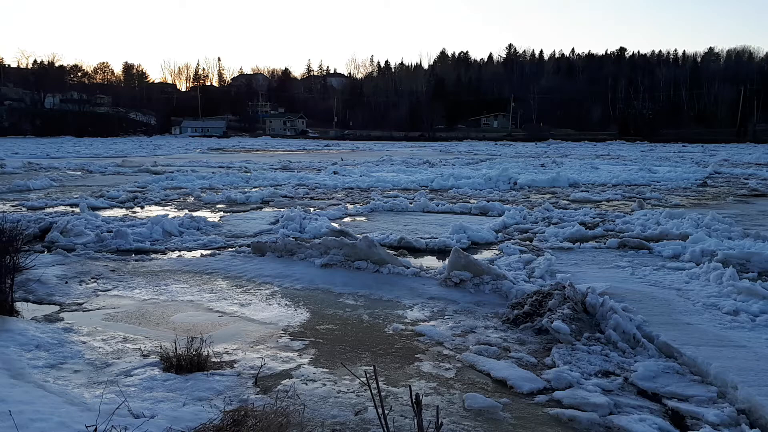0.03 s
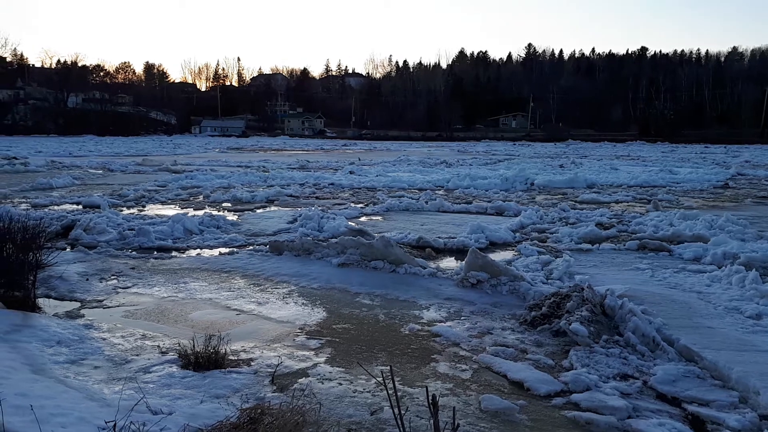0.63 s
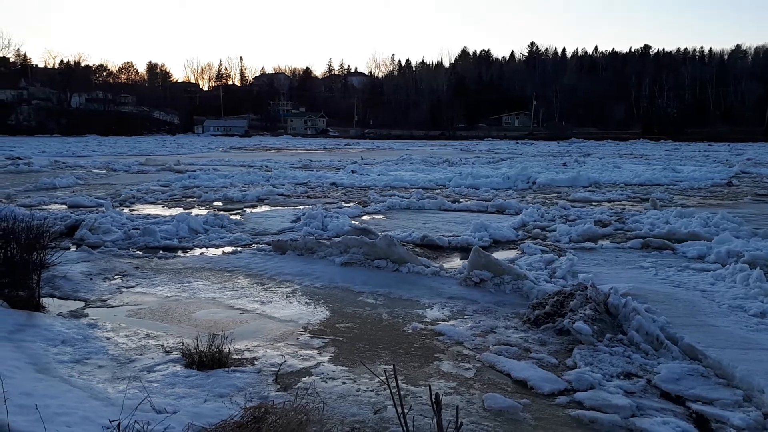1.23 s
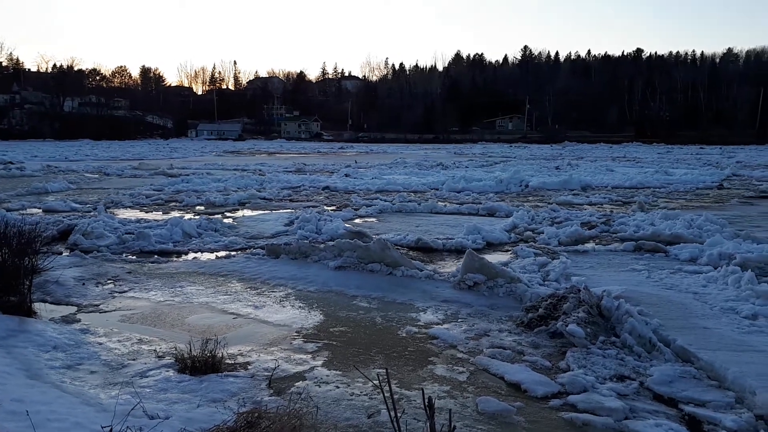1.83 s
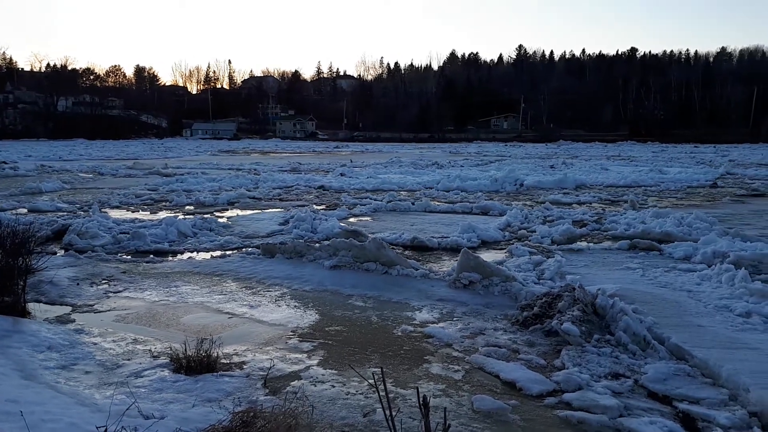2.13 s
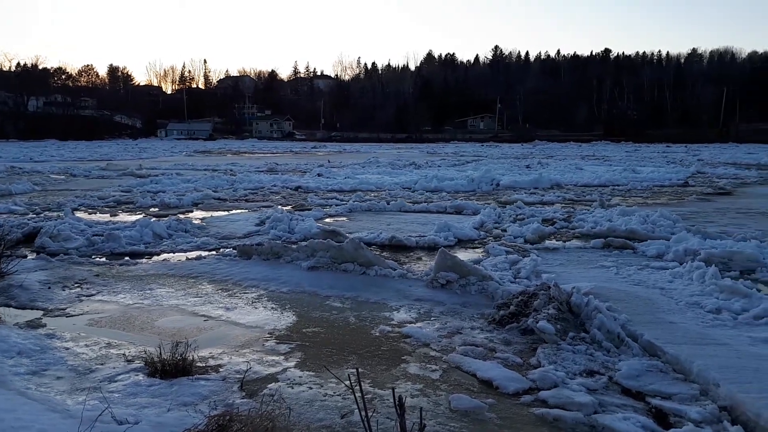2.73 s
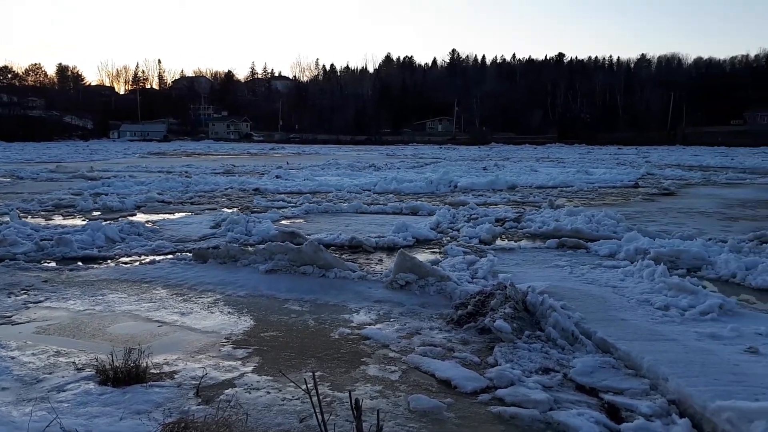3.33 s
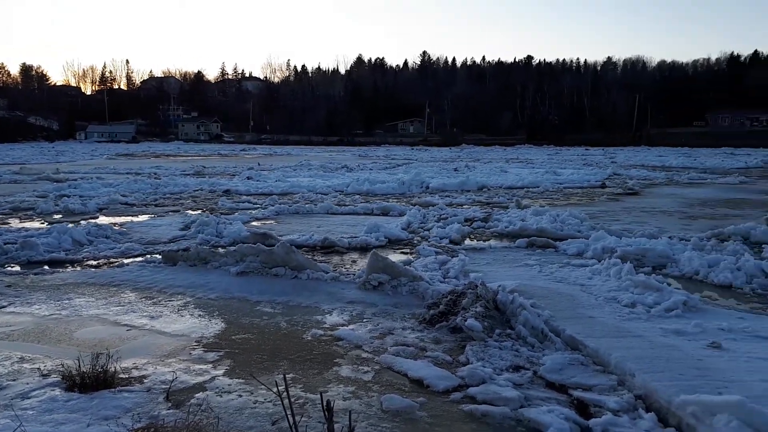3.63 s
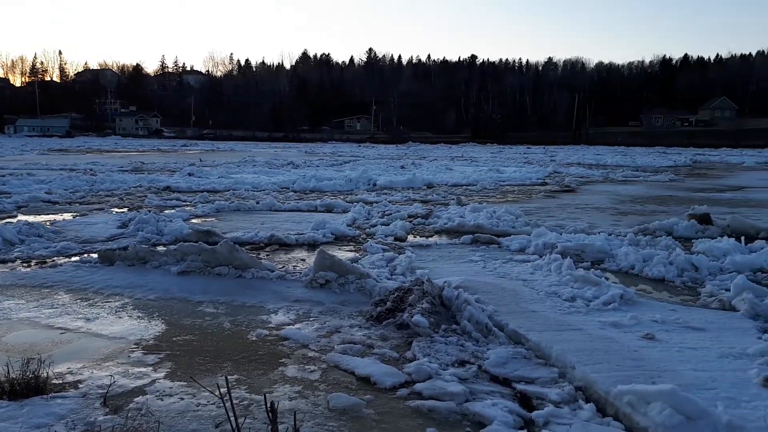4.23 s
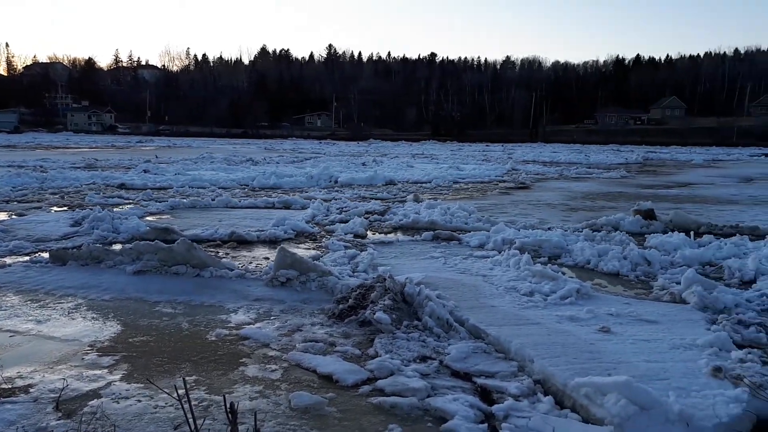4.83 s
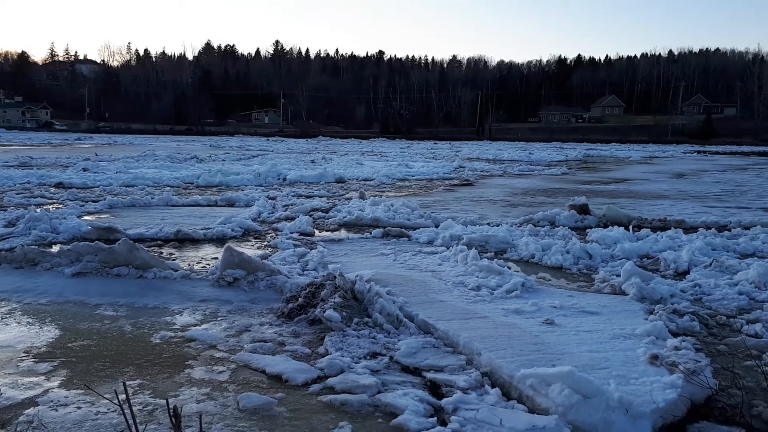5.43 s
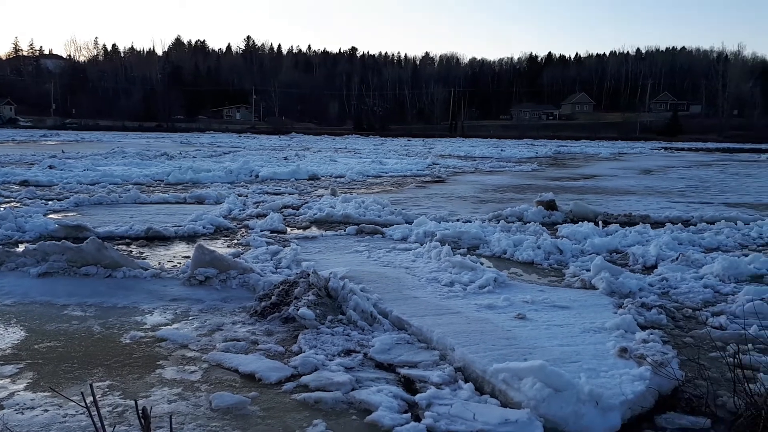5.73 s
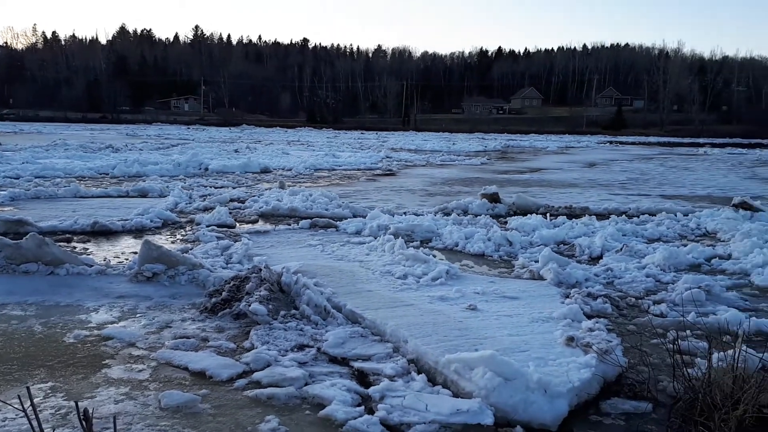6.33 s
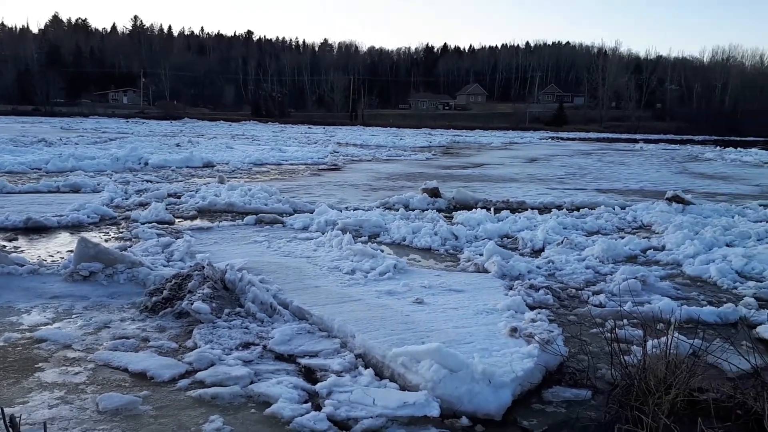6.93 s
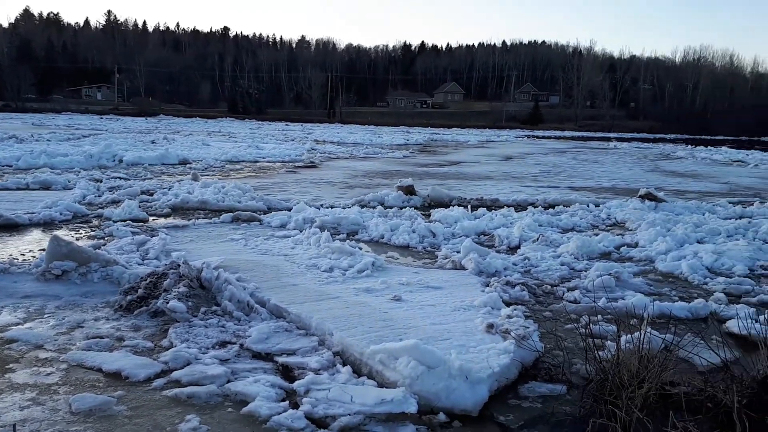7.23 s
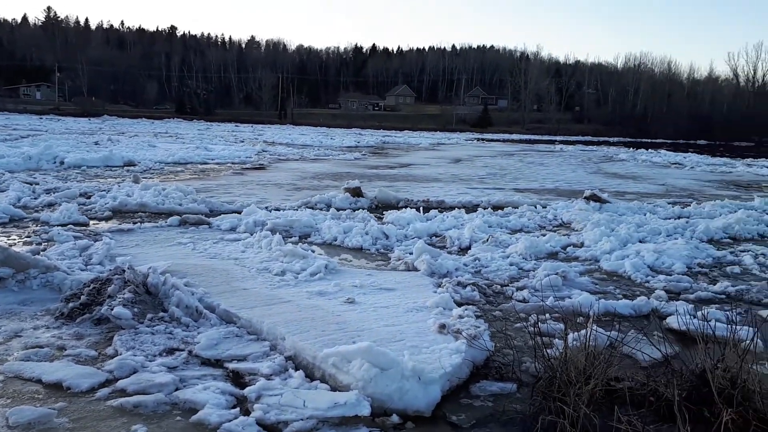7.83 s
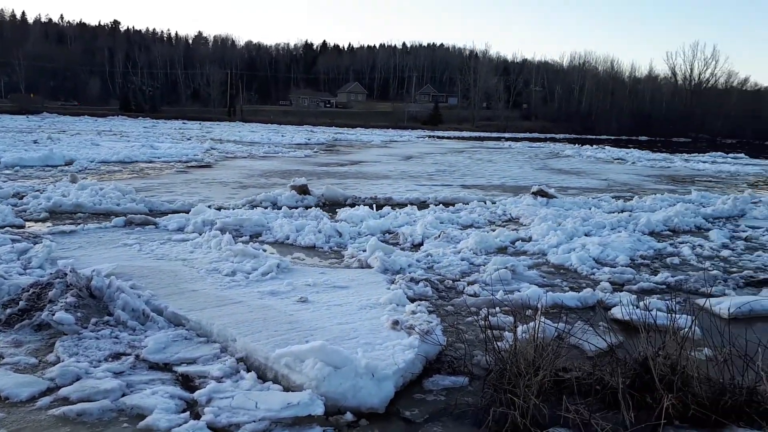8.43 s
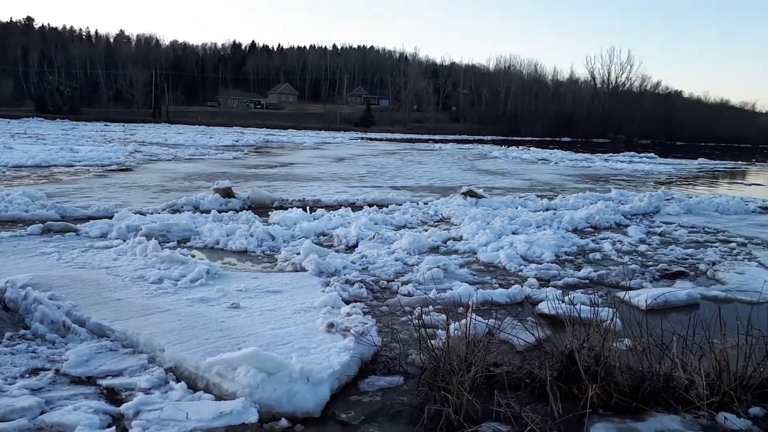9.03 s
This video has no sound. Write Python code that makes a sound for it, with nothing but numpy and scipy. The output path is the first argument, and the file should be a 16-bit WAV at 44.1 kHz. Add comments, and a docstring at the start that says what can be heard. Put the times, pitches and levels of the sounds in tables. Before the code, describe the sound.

Heard from an open bank through a slowly turning stereo microphone, a river makes a broad, constant rush topped by a fine fizz of slush. Short ice snaps and bright ticks come early. Low wind buffeting peaks just before the middle, lulls for about two seconds while waves swell, and comes back strongly on the left, with a final small crack.

```python
"""A swollen river carries broken ice past an open bank at dusk; a hand-held microphone pair slowly turns.
Throughout, the current roars far out and slush fizzes nearer by. In the first 4 s floes crack and crumble,
with fine ticks at the left ear near 1 s. Gusts buffet the ports, hard around 4 s, then lull from 4.8 to 7 s
as waves lift the roar. The gusts return on the left; a last crack and tick sound near 8.8 s."""
import sys
import numpy as np
from scipy import signal
from scipy.fft import rfft, irfft, next_fast_len
from scipy.io import wavfile
from scipy.ndimage import uniform_filter1d

SR = 44100
rng = np.random.default_rng(int(sys.argv[2]) if len(sys.argv) > 2 else 0)


def transcribe(u):
    """Save the signal u as a 16-bit wav file named by the first command-line argument.

    u: samples, shape (n,) or (channels, n), limited to [-1, 1]; the rate is SR.
    q: integer samples, one column per channel.
    """
    v = np.clip(np.atleast_2d(u).T, -1, 1)
    q = np.round(v * 32767).astype(np.int16)
    wavfile.write(sys.argv[1], SR, q)


N = 400869
TIME = np.arange(N) / SR
N_FFT = next_fast_len(N + 4096)
HZ = np.maximum(np.arange(N_FFT // 2 + 1) * SR / N_FFT, 1)

# rumble of moving air, common to both ears: (time [s], level [dB])
BREEZE_DB = [(0, -57.5), (3.4, -56.5), (4.55, -57.5), (4.8, -77.5), (6.85, -78.5), (7.3, -57.5), (9.1, -58)]


def from_db(db):
    """Decibels to gain."""
    return 10 ** (np.asarray(db) / 20)


def rms_one(x):
    """Scale to unit rms."""
    return x / np.sqrt(np.mean(x ** 2) + 1e-20)


def in_time(rows):
    """Each column of a time curve, per sample."""
    times_s, *columns = np.transpose(rows)
    return [np.interp(TIME, times_s, column) for column in columns]


def at_hz(points, hz):
    """Interpolate on a log-frequency axis."""
    points_hz, values = np.transpose(points)
    return np.interp(np.log(hz), np.log(points_hz), values)


def filtered(x, gain):
    """Apply a gain per frequency."""
    return irfft(rfft(x, N_FFT) * gain, N_FFT)[..., :N]


def coloured(x, spectrum):
    """Apply a (frequency [Hz], gain [dB]) curve."""
    return filtered(x, from_db(at_hz(spectrum, HZ)))


def delayed(x, ms):
    """Fractional delay."""
    return np.interp(TIME - ms / 1000, TIME, x)


def drift(corner_hz):
    """Slow random wander, unit rms."""
    hop, settle = 40, 2000
    pole = np.exp(-2 * np.pi * corner_hz * hop / SR)
    white = rng.standard_normal(N // hop + settle + 2)
    slow = signal.lfilter([1], [1, -2 * pole, pole * pole], white)[settle:]
    return np.interp(np.arange(N) / hop, np.arange(len(slow)), rms_one(slow))


def resonance(x, hz, width_hz):
    """Two-pole band-pass, unit peak gain."""
    r = np.exp(-np.pi * width_hz / SR)
    feedback = [1, -2 * r * np.cos(2 * np.pi * hz / SR), r * r]
    return signal.lfilter(np.array([1, 0, -1]) * (1 - r * r) / 2, feedback, x + 1e-18)


def band(x, hz, width_hz):
    """Two equal resonances in series."""
    return resonance(resonance(x, hz, width_hz), hz, width_hz)


def clicks(per_s, spread_db):
    """Random clicks, independent per ear: mostly small, a few large."""
    out = np.zeros((2, N))
    for ear in range(2):
        sizes = from_db(spread_db * np.minimum(rng.exponential(1, N), 4))
        out[ear] = sizes * rng.choice([-1, 1], N) * (rng.random(N) < per_s / SR)
    return out


def air_rumble():
    """The surrounding air rumbles alike in both ears."""
    # (frequency [Hz], level [dB])
    spectrum = [(30, -14), (70, -1.5), (150, -3.5), (260, -3.5), (330, -7.5), (430, -32), (700, -52)]
    return rms_one(coloured(rng.standard_normal(N), spectrum)) * from_db(in_time(BREEZE_DB)[0])


def port_wind(turned, thinning, strong_db, pitch_ratio, lurch_db, unrest_db):
    """Eddies press on each port separately; the right port is sheltered."""
    # push on the exposed left port: (time [s], level [dB])
    left_push = [(0.2, -48.5), (1.2, -50), (1.6, -55.5), (3.65, -51), (3.92, -40.5), (4.35, -41.5),
                 (4.6, -44.5), (4.85, -80), (5.5, -68), (6.8, -71), (7.12, -61), (7.2, -45), (8.1, -42.5),
                 (8.16, -47), (8.3, -40.5), (8.85, -40.5), (8.95, -38.5), (9.01, -48), (9.06, -36.5)]
    # eddy pressure: (frequency [Hz], level [dB])
    spectrum = [(15, -44), (45, -1.5), (68, 5), (115, 2.5), (160, -6), (225, -15.5), (300, -21.5),
                (450, -26), (1100, -48)]
    lee_db = -6.5
    push_db = np.array([in_time(left_push)[0], in_time(BREEZE_DB)[0] + lee_db])
    gust_db = push_db + unrest_db * drift(27)
    white = rng.standard_normal((2, N))
    gentle = rms_one(coloured(white, spectrum))
    # faster air sheds smaller eddies: higher rumble
    fast = rms_one(filtered(white, from_db(at_hz(spectrum, HZ / pitch_ratio))))
    force = 1 / (0.5 + np.exp((strong_db - gust_db) / 2))
    eddies = (1 - force) * gentle + force * fast
    # side-on, the ports catch fewer large, deep eddies
    eddies -= np.clip(thinning * turned, 0, 1) * filtered(eddies, 1 / (1 + (HZ / 80) ** 4))
    # successive eddies are of like strength
    eddies /= np.sqrt(uniform_filter1d(eddies ** 2, size=3500) + 0.0079)
    wander_db = lurch_db * np.array([drift(36) for ear in range(2)])
    return eddies * from_db(gust_db + wander_db + [[-0.2], [-1.4]])


def buffets():
    """An eddy thumps one port: higher if smaller, brighter if harder."""
    # (time [s], level [dB], pitch [Hz], rise and fall [s], left-right [dB])
    thumps = [(0.275, -40, 105, .02, 18), (0.331, -31.5, 90.5, 0.015, 31), (0.365, -40, 108, 0.014, 20),
              (0.613, -42, 94, 0.032, 10), (0.945, -40, 110, 0.044, 18), (1.81, -39.5, 99, 0.031, 12),
              (2.362, -39.5, 93.5, 0.032, 24), (2.532, -42, 105, 0.039, 19), (2.962, -39.5, 100, 0.016, 19),
              (3.357, -37, 126, 0.017, 22), (3.568, -32, 107, 0.0081, 34), (3.816, -36.5, 158, 0.038, -23),
              (3.851, -28, 122, 0.016, -24), (3.911, -34.5, 112, 0.015, 20),
              (4.019, -32.5, 113, 0.021, -32), (4.06, -38, 140, 0.054, 23), (4.088, -33, 104, 0.03, -24),
              (4.207, -29.5, 103, 0.0064, 15), (4.285, -36.5, 119, 0.026, -21),
              (4.332, -31, 136, 0.0098, 23), (7.59, -37, 138, 0.023, 28), (7.646, -30.5, 143, 0.009, 33),
              (7.797, -35.5, 115, 0.01, 32), (8.018, -36, 97, 0.017, 28), (8.518, -30, 127, 0.02, 25),
              (8.774, -30, 165, 0.0066, 26), (8.814, -33.5, 140, 0.054, 28), (8.91, -30.5, 142, 0.0069, 28),
              (8.969, -34.5, 111, 0.0084, 31)]
    usual_top_hz, usual_db, db_per_octave = 233, -35, 13
    out, size = np.zeros((2, N + SR)), SR // 4
    t = TIME[:size] - TIME[size // 2]
    for time_s, level_db, hz, length_s, pan_db in thumps:
        swings = band(rng.standard_normal(size), hz, width_hz=0.85 * hz)
        swings /= np.sqrt(uniform_filter1d(swings ** 2, size=650) + 1e-12)
        top_hz = usual_top_hz * 2 ** ((level_db - usual_db) / db_per_octave)
        swings = signal.sosfilt(signal.butter(4, top_hz, fs=SR, output="sos"), swings)
        ears = from_db(level_db + np.minimum([[pan_db], [-pan_db]], 0))
        at = int(time_s * SR) - size // 2
        out[:, at:at + size] += ears * swings * np.exp(-(t / length_s) ** 2)
    return out[:, :N]


def surging_db(small_waves_db):
    """Level of the roar: a slow swell, a loose train of small waves, a few big ones."""
    # swell of the current: (time [s], level [dB])
    swell = [(0.2, -57.5), (0.7, -55.5), (1.55, -57.5), (2.2, -56), (3.05, -58.5), (3.8, -53.5),
             (4.85, -57), (5.15, -52.5), (5.95, -55), (6.7, -53.5), (7.4, -54), (9.05, -53.3)]
    # (time [s], rise [dB])
    big_waves = [(4.64, 5.5), (5.47, 3.5), (5.68, 3.5), (5.85, 2.5), (6.23, 1), (6.5, 2.8), (6.86, 2)]
    rate_hz, spread_hz, rise_fall_s = 2.3, 4.1, 0.038
    small = rms_one(filtered(rng.standard_normal(N), np.exp(-((HZ - rate_hz) / spread_hz) ** 2)))
    big_db = sum(db * np.exp(-((TIME - time_s) / rise_fall_s) ** 2) for time_s, db in big_waves)
    return in_time(swell)[0] + small_waves_db * small + big_db


def far_roar(level_db, lag_ms, turned, flutter_db, brightening):
    """The main current roars far out and reaches one ear before the other."""
    # (frequency [Hz], level [dB])
    spectrum = [(40, -24), (110, -9), (220, -21.5), (330, -3.5), (430, -8), (580, 0.5), (760, 2.5),
                (950, -2.5), (1200, -14.5), (1600, -23), (2400, -26), (4500, -29)]
    # likeness at the two ears: (frequency [Hz], coherence [0-1])
    coherence = [(200, 0.94), (600, 0.84), (1000, 0.63), (2000, 0.7)]
    alike = at_hz(coherence, HZ)
    colour = from_db(at_hz(spectrum, HZ))
    direct = filtered(rng.standard_normal(N), colour * np.sqrt(alike))
    diffuse = filtered(rng.standard_normal((2, N)), colour * np.sqrt(1 - alike))
    facing = rms_one(np.array([delayed(direct, lag_ms / 2), delayed(direct, -lag_ms / 2)]) + diffuse)
    # side-on, the roar is centred higher
    mids = filtered(facing, np.exp(-np.log2(HZ / 1080) ** 2 / 0.18))
    side_on = rms_one(facing + brightening * mids)
    share = np.clip(2 * turned, 0, 1) ** 2
    return ((1 - share) * facing + share * side_on) * from_db(level_db + flutter_db * drift(12.4))


def fizz(churn_db, grain_db, flutter_db, hiss_pan_db):
    """Fine spray partly follows the churn; a thin hiss lies above it."""
    # both: (frequency [Hz], level [dB])
    spray_spectrum = [(2000, -1.5), (3500, -5), (4500, 0), (5500, 0), (6600, -0.5), (7600, 2.5), (8100, -1),
                      (8700, -11), (10000, -7), (11500, -17), (16000, -28)]
    hiss_spectrum = [(5000, -6), (8500, 3), (11000, 1), (13500, -4), (15700, -1)]
    # (time [s], level [dB])
    hiss_curve = [(.7, -74), (1.2, -64), (1.7, -79), (3.3, -75), (4.2, -70.5), (4.7, -67), (5.1, -60.5),
                  (5.5, -65), (9.1, -69.5)]
    spray_db = -60.5 + 0.35 * (churn_db - churn_db.mean())
    wash = rng.standard_normal((2, N)) + from_db(grain_db) * rms_one(clicks(per_s=2500, spread_db=5.0))
    spray = rms_one(coloured(wash, spray_spectrum))
    spray *= from_db(spray_db + flutter_db * drift(17.0) + [[-1.2], [1.2]])
    hiss = rms_one(coloured(rng.standard_normal((2, N)), hiss_spectrum))
    hiss *= from_db(in_time(hiss_curve)[0] + 2.2 * drift(12))
    return spray + hiss * from_db([[hiss_pan_db / 2], [-hiss_pan_db / 2]])


def grains(low_hz, high_hz, per_s, q, patchy_db, bands=14):
    """Tiny bubbles and crystals ring for a few cycles, in clumps."""
    out = np.zeros((2, N))
    for hz in np.geomspace(low_hz, high_hz, bands):
        rings = resonance(clicks(per_s / bands, spread_db=3.0), hz, hz / q)
        out += rms_one(rings) * np.sqrt(hz) * from_db(patchy_db * drift(5.3))
    return rms_one(out)


def slush(level_db, pan_db, lag_ms, grain_db, direct_db, flutter_db, slosh_db):
    """Ice crumbs jostle in the water; the nearest stand out of the wash as grains."""
    # water sloshing between floes: (centre [Hz], width [Hz], gain [ratio])
    peaks = [(1450, 400, 0.18), (2186, 330, 0.37)]
    # both: (frequency [Hz], level [dB])
    left_spectrum = [(600, -28), (1000, -2), (1230, -7), (1550, 2.5), (1900, -2), (2200, -6.5),
                     (3000, -4.5), (4300, -9.5), (6000, -16.5), (9000, -23)]
    right_spectrum = [(600, -9), (1000, -0.5), (1250, -3), (1570, 2.5), (1900, -1), (2330, 1.5), (2800, -6),
                      (3900, -7), (5500, -21), (9000, -43)]
    crumbs = from_db(grain_db) * grains(1000, 5410, per_s=1500, q=7.6, patchy_db=2.5)
    direct = from_db(direct_db) * rng.standard_normal(N)
    wash = rng.standard_normal((2, N)) + crumbs + np.array([delayed(direct, lag_ms), direct])
    for hz, width_hz, gain in peaks:
        wash += gain * resonance(wash, hz, width_hz) * from_db(slosh_db * drift(6.5))
    ears = rms_one(np.array([coloured(wash[0], left_spectrum), coloured(wash[1], right_spectrum)]))
    return ears * from_db(level_db + flutter_db * drift(14.0) + np.array([pan_db, -pan_db]) / 2)


def shadowed(x, turned):
    """Turned away, the left ear loses mids; a later path hollows the right ear's treble."""
    left = x[0] - np.clip(1.64 * turned, 0, 1) ** 2 * resonance(x[0], hz=1520, width_hz=420)
    depth = 0.46 * np.tanh(1.9 * turned)
    right = (x[1] - depth * delayed(x[1], ms=0.361)) / np.sqrt(1 + depth ** 2)
    return np.array([left, right])


def ticks(gain_db, decay_s, crackle_right_db):
    """Short, bright, close ticks amid a fine crackle."""
    # (time [s], relative peak [dB], left-right [dB])
    events = [(0.9173, -35, 20), (1.0250, -44, 12), (1.0420, -38, 15), (1.129, -46, 12), (1.2416, -37, 17),
              (1.253, -39, 16), (1.26, -39, 15), (8.762, -43, -3)]
    # (time [s], level [dB])
    crackle_curve = [(.3, -97), (.41, -56), (.5, -90), (.98, -85), (1.04, -58), (1.27, -54), (1.34, -63),
                     (1.55, -58), (1.8, -90)]
    # (frequency [Hz], level [dB])
    crackle_spectrum = [(4000, -20), (8000, -21), (11000, -21), (13000, -16), (15500, -18)]
    out, t = np.zeros((2, N)), TIME[:SR // 20]
    for time_s, peak_db, pan_db in events:
        burst = rng.standard_normal((2, len(t))) * np.exp(-t / decay_s)
        tick = resonance(burst, hz=14000, width_hz=11000)
        ears = from_db([[pan_db / 2], [-pan_db / 2]])
        at = int(time_s * SR)
        out[:, at:at + len(t)] += from_db(peak_db + gain_db) * tick / np.abs(tick).max() * ears / ears.mean()
    crackle = rms_one(coloured(clicks(per_s=1200, spread_db=3.5), crackle_spectrum))
    return out + crackle * from_db(in_time(crackle_curve)[0] + [[0], [crackle_right_db]])


def ice_showers():
    """Ice gives way in a dying shower of small snaps: a floe edge crumbles, ice scrapes along ice, or slush
    swishes."""
    # (time [s], level [dB], centre [Hz], length [s])
    showers = [(0.425, -57, 2700, 0.032), (0.803, -56, 1530, 0.033), (1.101, -54, 1530, 0.023),
               (1.319, -57, 2880, 0.039), (2.052, -61, 1620, .04), (2.65, -63, 2250, 0.2),
               (3.404, -58, 1300, 0.044), (3.634, -50, 1900, 0.037), (4.13, -57.5, 4100, 0.06),
               (5.578, -62.5, 3650, 0.13), (6.717, -64, 4200, 0.14), (7.38, -63, 2200, 0.18),
               (8.58, -62, 2400, 0.14), (8.6, -60.5, 6800, 0.14)]
    snaps_per_s, rise_share = 2000, 0.098
    out, t = np.zeros(N), TIME[:SR // 2]
    for time_s, level_db, hz, length_s in showers:
        snaps = rng.standard_normal(len(t)) * (rng.random(len(t)) < snaps_per_s / SR)
        envelope = np.tanh(t / (rise_share * length_s)) * np.exp(-(t / length_s) ** 2)
        shower = rms_one(band(snaps, hz, width_hz=hz)) * envelope
        at = int(time_s * SR)
        out[at:at + len(t)] += from_db(level_db) * shower[:N - at]
    return out


def cracks(snap_db, opening_s):
    """A floe cracks: a rough snap with a short ring."""
    # (time [s], peak [dB], pitch [Hz], t60 [s])
    events = [(0.4245, -35.5, 2400, 0.017), (0.782, -40, 1540, 0.025), (0.7978, -39, 1590, 0.025),
              (.809, -39, 6700, .01), (1.024, -39, 2880, 0.0091), (1.16, -30, 2400, 0.017),
              (1.201, -35.5, 1780, 0.02), (1.2015, -41, 4500, .012), (1.328, -37, 2970, 0.014),
              (2.0688, -40.5, 1600, 0.018), (3.421, -41.5, 1000, 0.027), (3.6416, -40, 1080, 0.02),
              (3.659, -40, 930, 0.027), (8.7627, -40, 2500, 0.007), (8.7624, -36, 6800, 0.007)]
    out, t = np.zeros(N), TIME[:SR // 10]
    for time_s, peak_db, hz, t60_s in events:
        snap = band(rng.standard_normal(len(t)), hz, width_hz=0.7 * hz)
        crack = np.sin(2 * np.pi * hz * t) + from_db(snap_db) * snap
        crack *= np.tanh(t / opening_s) * from_db(-60 * t / t60_s)
        at = int(time_s * SR)
        out[at:at + len(t)] += from_db(peak_db) * crack / np.abs(crack).max()
    return out


def scene():
    """River, ice and wind at the turning microphones."""
    # (time [s], left-ear lag [ms], slush left-right [dB], turned away [0-1])
    turn = [(0, 0.19, -1, 0.04), (3, 0.15, -1.5, 0.18), (4.5, 0.011, 0, 0.29), (5.8, -0.081, 2, 0.26),
            (7.3, -0.25, 0.5, 0.39), (9.1, -0.31, 4.5, 0.76)]
    # churning of the slush: (time [s], level [dB])
    churn = [(0.2, -56), (0.95, -53), (1.4, -55.5), (2.45, -58.5), (3.15, -57.5), (3.99, -54.5),
             (4.91, -61), (5.2, -58), (5.64, -60), (6.83, -61), (7.37, -55.5), (8.4, -55), (8.74, -52.5),
             (8.95, -55.5)]
    lag_ms, pan_db, turned = in_time(turn)
    churn_db, = in_time(churn)
    crumbs = slush(churn_db + 2, pan_db, lag_ms, grain_db=-11, direct_db=-10, flutter_db=1, slosh_db=4)
    spray = fizz(churn_db, grain_db=-5, flutter_db=1, hiss_pan_db=5)
    near = shadowed(crumbs + spray, turned)
    far = far_roar(surging_db(small_waves_db=0.34), lag_ms, turned, flutter_db=1.2, brightening=1.36)
    ice = cracks(snap_db=8, opening_s=0.00019) + ice_showers()
    floes = np.array([delayed(ice, ms=0.051), ice]) * from_db([[-0.75], [0.75]])  # slightly right
    close = ticks(gain_db=5.5, decay_s=0.00033, crackle_right_db=-17)
    thumps = buffets()
    gusts = port_wind(turned, thinning=1.9, strong_db=-47, pitch_ratio=1.05, lurch_db=3, unrest_db=1)
    return air_rumble() + gusts + thumps + far + near + close + floes


def port_gain(bumps):
    """Gain per frequency of a port's peaks and hollows."""
    return from_db(sum(db * np.exp(-((HZ - hz) / width_hz) ** 2) for hz, width_hz, db in bumps))


def record(dry):
    """The microphones open after a moment; each port adds colour; deep bass and the top are cut."""
    # both: (centre [Hz], width [Hz], gain [dB])
    left_port = [(1880, 140, -4.5), (2150, 140, 2.5), (9650, 1600, -5.5)]
    right_port = [(15200, 700, 1)]
    open_s, bass_cut_hz, top_cut_hz = 0.106, 38, 15900
    opened = from_db(np.interp(TIME, [0, open_s - 0.008, open_s], [-60, -44, 0]))
    ported = filtered(dry * opened, np.array([port_gain(left_port), port_gain(right_port)]))
    ported = signal.sosfilt(signal.butter(2, bass_cut_hz, "high", fs=SR, output="sos"), ported)
    return filtered(ported, 1 / np.sqrt(1 + (HZ / top_cut_hz) ** 300))


dry = scene()
out = record(dry)
transcribe(out)
```